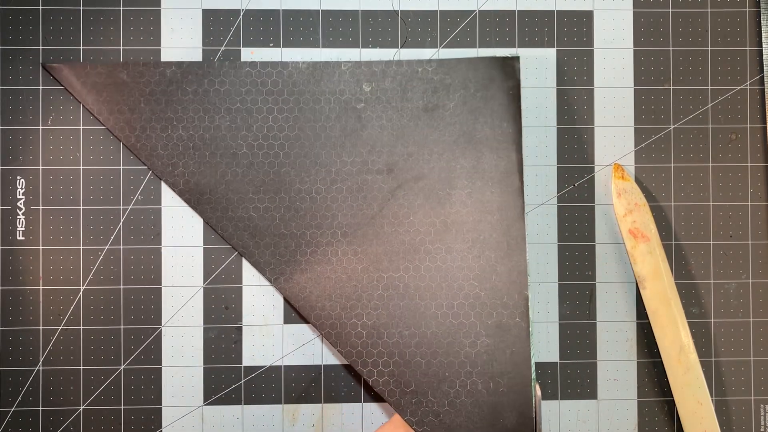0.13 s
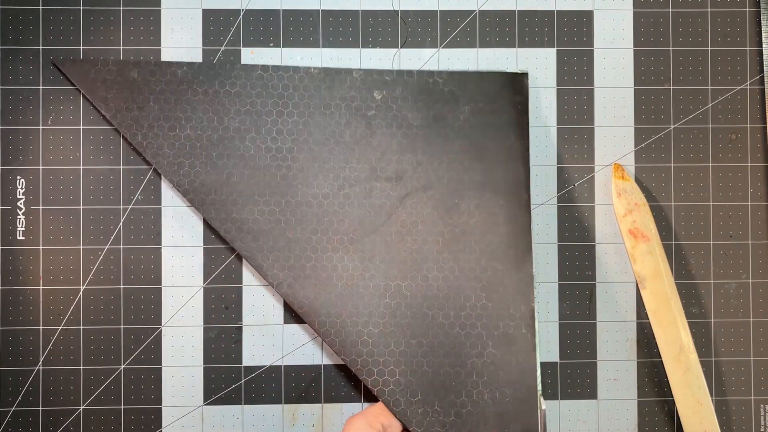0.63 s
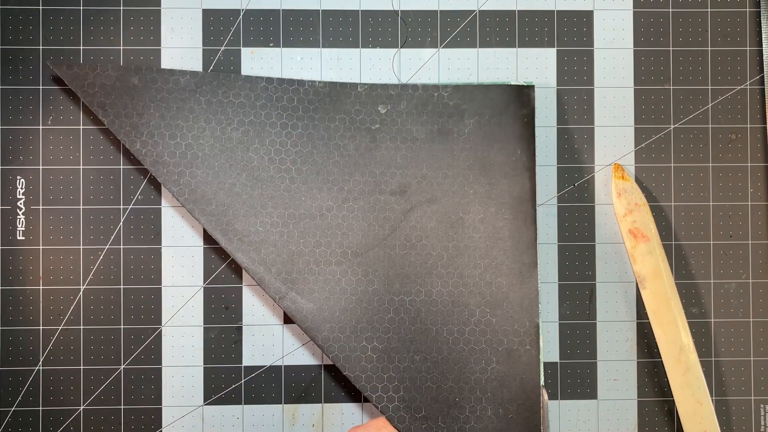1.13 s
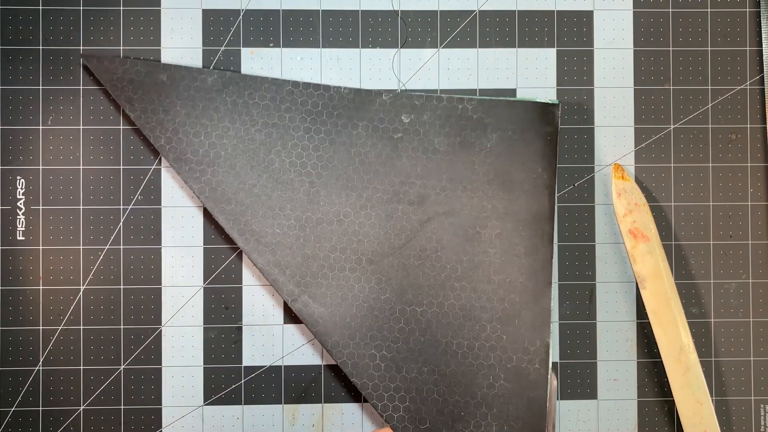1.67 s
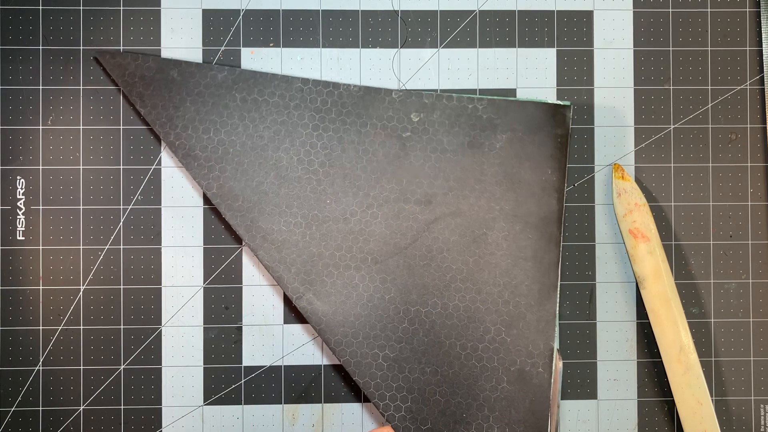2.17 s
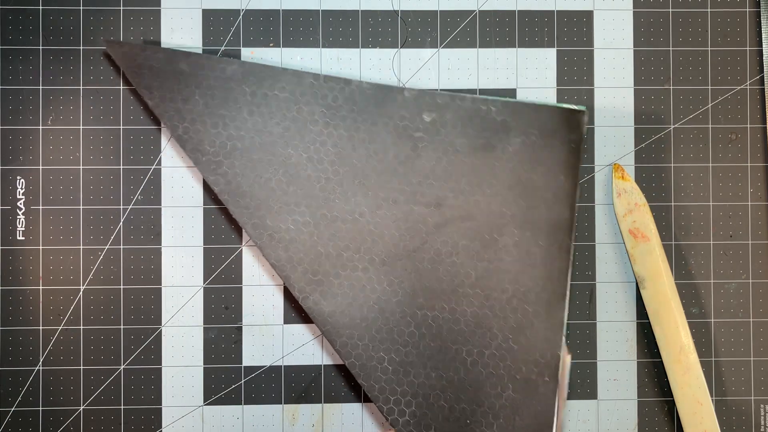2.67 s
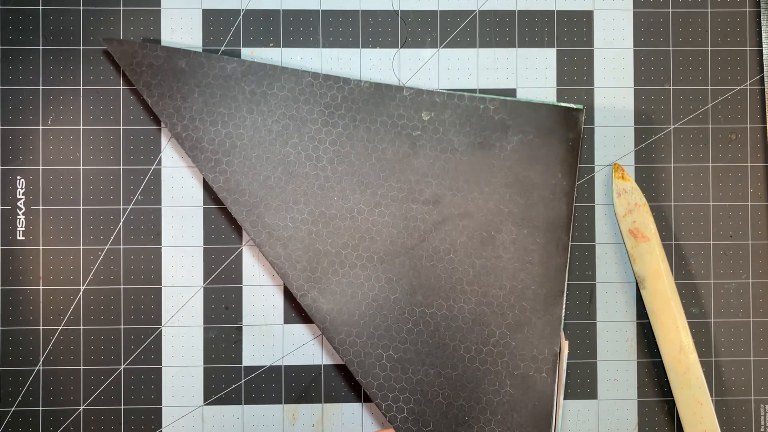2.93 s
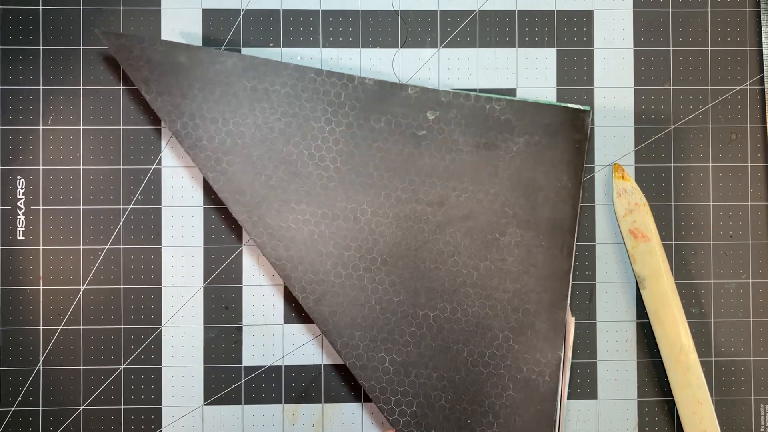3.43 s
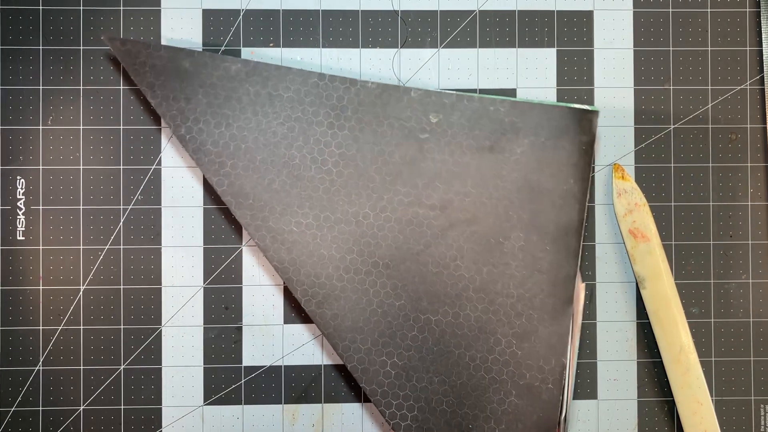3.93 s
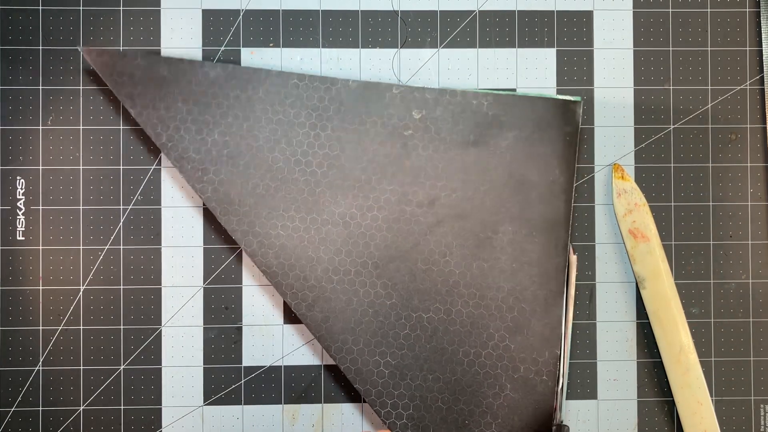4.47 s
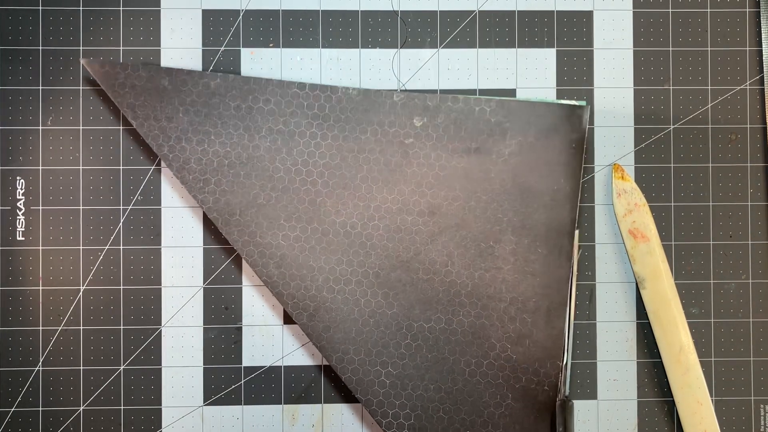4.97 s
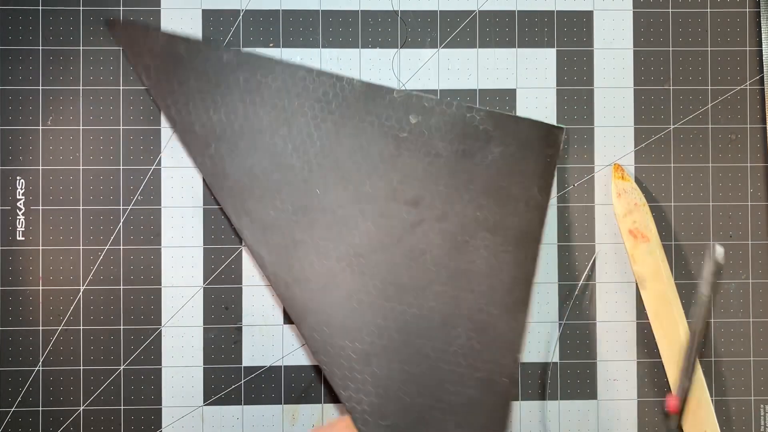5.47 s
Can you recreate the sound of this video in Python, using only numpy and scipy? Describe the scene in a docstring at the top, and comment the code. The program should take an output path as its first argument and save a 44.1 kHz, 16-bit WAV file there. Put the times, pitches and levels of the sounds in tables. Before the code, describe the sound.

A thick sheet is handled with light snaps and dull taps for about a second, then cut by scissors: each bite a short run of hollow, papery crunches with fine hiss, followed by a softer reopening slide. One hard crack stands out. Cutting stops, the sheet is drawn away and scrapes loudly. Near, dry sound, short room tail, faint low rumble.

```python
"""Scissors cutting a stiff sheet

Scissors work along the edge of a stiff sheet held over a craft table, near a two-port microphone.
The sheet snaps lightly while handled, then gives way in jerks to the closing blades; opening blades slide
along the cut. Shaped noise drives the sheet's damped modes and breaks its fibres. Hands rub and rustle it,
small ticks and one loud snap are bursts of noise, and at the end it is drawn off and scrapes past an edge.
A small room answers with diffuse noise tails, over dull thuds, a low rumble and a faint hush."""
import sys
import numpy as np
from scipy import signal
from scipy.fft import rfft, irfft, next_fast_len
from scipy.io import wavfile
from scipy.ndimage import uniform_filter1d, map_coordinates

SR = 44100
rng = np.random.default_rng(int(sys.argv[2]) if len(sys.argv) > 2 else 0)


def ratio_of_db(decibels):
    """Turn decibels (scalar or array-like) into linear amplitude factors; 0 dB maps to 1."""
    return 10 ** (np.asarray(decibels, float) / 20)


def dump(signal):
    """Clip the signal to [-1, 1] and save it as 16-bit WAV at the path in sys.argv[1]."""
    limited = np.clip(np.atleast_2d(signal).T, -1, 1)
    pcm = np.round(limited * 32767).astype(np.int16)
    wavfile.write(sys.argv[1], SR, pcm)


N = 246959  # samples


def unit(x):
    """Normalisation: scale to rms 1."""
    return x / np.sqrt(np.mean(x ** 2) + 1e-20)


def along(points, hz):
    """Logarithmic frequency scale: interpolate (Hz, value) points on it."""
    f, v = np.transpose(points)
    return np.interp(np.log(hz + 1), np.log(f + 1), v)


def gains(rows):
    """Level law: a gain per sample for each dB column, silent outside the table."""
    s, *cols = np.transpose(rows)
    t = np.arange(N) / SR
    return ratio_of_db([np.interp(t, s, c, -150, -150) for c in cols])


def wobble(rate):
    """Slow random fluctuation: a smooth curve through rate random knots a second."""
    knots = rng.standard_normal(int(N * rate / SR) + 4)
    return map_coordinates(knots, [np.arange(N) * rate / SR])


def filtered(x, response):
    """Linear filtering by a complex response of frequency; white noise keeps its power."""
    m = next_fast_len(N + SR // 2)
    h = response(np.fft.rfftfreq(m, 1 / SR))
    h = h / np.sqrt(np.mean(abs(h) ** 2))
    return irfft(rfft(x, m) * h, m)[..., :N]


def causal(spectrum):
    """Causality: the minimum-phase response with the given dB points, by folding the cepstrum."""
    def response(hz):
        cep = irfft(np.log(ratio_of_db(along(spectrum, hz))))
        cep[1:len(hz) - 1] *= 2
        cep[len(hz):] = 0
        return np.exp(rfft(cep))
    return response


def grit(rough_db, rate, patchy_db=4.0):
    """Stick-slip friction: uneven noise of rms 1, coloured by narrow brief resonances of the bent sheet."""
    z = signal.stft(rng.standard_normal(N), nperseg=512)[2]
    field = uniform_filter1d(rng.standard_normal(z.shape), size=2, axis=0)
    field = uniform_filter1d(field, size=5, axis=1)
    noise = signal.istft(z * ratio_of_db(patchy_db * unit(field)), nperseg=512)[1][:N]
    noise = noise * ratio_of_db(rough_db * wobble(rate))
    # running power over about 10 ms, divided out to keep the level steady
    power = abs(uniform_filter1d(noise ** 2, size=500))
    return noise / np.sqrt(power + 1e-12)


def crackle(size_db):
    """Random impulses (Poisson process): single fibres snap and the gain jumps briefly."""
    snaps_per_s, decay_s, most_db = 90, 0.001, 20
    chance, size = rng.random(N), rng.exponential(size=N)
    snaps = (chance < snaps_per_s / SR) * size
    jumps = signal.lfilter([1], [1, -np.exp(-1 / (decay_s * SR))], snaps)
    return ratio_of_db(np.minimum(size_db * jumps, most_db))


def touch(t, rise_s):
    """Smooth onset around t = 0: a faint exponential lead-in, then a quick rise."""
    lead_in, lead_in_s = ratio_of_db(-22), 0.0051
    before = lead_in * np.exp(np.minimum(t, 0) / lead_in_s)
    rise = 1 - (1 - lead_in) * np.exp(-abs(t) / rise_s)
    return np.where(t < 0, before, rise)


def strokes(rows, rise_s, arch_db, t60_s):
    """Amplitude envelopes of sliding contact, three layers: onset, swell, sag and exponential decay."""
    lead = SR // 10
    env, t = np.zeros((3, N + SR)), np.arange(-lead, SR // 2) / SR
    for s, length, *dbs, sag_db in rows:
        u = 2 * np.clip(t / length, 0, 1) - 1  # -1 at the start of the stroke, 1 at its end
        after = np.maximum(t - length, 0)
        shape = touch(t, rise_s) * ratio_of_db(-arch_db * u ** 2 - sag_db * u / 2 - 60 * after / t60_s)
        env[:, round(s * SR):][:, :len(t)] += ratio_of_db(dbs)[:, None] * shape
    return env[:, lead:lead + N]


# Hand and handles bump table and sheet: start_s, level_db (before envelope and wobble),
# pitch_hz (once settled), t60_s
THUDS = [(0.417, -55.5, 538, 0.13), (.445, -67.5, 342, 0.11), (.46, -59, 65.4, 0.18),
         (.55, -54.5, 420, 0.076), (.63, -52.5, 594, 0.08), (0.946, -49.5, 492, 0.048),
         (3.563, -54, 260, 0.029), (3.578, -56, 76, 0.16), (4.748, -48, 130, 0.071), (4.754, -47, 80, 0.2)]


def bumps():
    """Damped oscillation: dull sinking rings whose phase wanders, the more so the higher they sound."""
    drop, drop_s = 0.4, 0.015  # a thud starts higher by this share and settles
    out, t = np.zeros(N + SR), np.arange(SR // 2) / SR
    for s, db, hz, t60 in THUDS:
        wander = hz / 5000 * np.cumsum(rng.standard_normal(len(t)))  # radians
        settling = t - drop * drop_s * np.exp(-t / drop_s)
        envelope = ratio_of_db(db - 60 * t / t60) * (1 - np.exp(-t / 0.004))
        out[round(s * SR):][:len(t)] += envelope * np.sin(2 * np.pi * hz * settling + wander)
    return out[:N] * ratio_of_db(3.1 * wobble(79))


# Spectrum of the building rumble: frequency_hz, density_db
RUMBLE_SPECTRUM = [(20, -23.5), (40, -7.5), (60, 6.5), (85, 7), (110, 2), (200, -8.5), (310, -10.5),
                   (500, -28.5), (900, -120)]
# Course of the rumble: time_s, level_db
RUMBLE_COURSE = [(0.0, -75.5), (0.7, -76.5), (1.3, -76.5), (2.0, -79.5), (2.8, -82.5), (3.4, -80.5),
                 (4.2, -83), (4.9, -84), (5.6, -85.5)]
# Spectrum of the hush: frequency_hz, density_db
HUSH_SPECTRUM = [(200, -11.5), (600, -14.5), (1200, 8.5), (2500, -1), (6000, -10.5), (12000, -20),
                 (16000, -34.5)]


def air():
    """Partial coherence: a rumble and a faint hush, each mostly common to both ports, and the thuds."""
    common, opposed, hush_common = rng.standard_normal((3, N))
    rumble = filtered(common + 0.51 * np.array([opposed, -opposed]),
                      lambda hz: ratio_of_db(along(RUMBLE_SPECTRUM, hz)))
    hush = filtered(hush_common + 0.27 * rng.standard_normal((2, N)),
                    lambda hz: ratio_of_db(along(HUSH_SPECTRUM, hz)))
    return gains(RUMBLE_COURSE) * ratio_of_db(2.0 * wobble(2.2)) * rumble + ratio_of_db(-80.5) * hush + bumps()


# Decay of the room: frequency_hz, t60_s
ROOM_DECAY = [(300, 0.2), (1200, 0.17), (5000, 0.28), (12000, 0.11)]
# Share of the tail's power common to both ports: frequency_hz, share
TAIL_COHERENCE = [(250, 0.15), (1000, 0.17), (2500, 0.24), (5500, 0.59), (12000, 1)]


def room(x):
    """Diffuse reverberation: a fresh decaying noise tail for each quarter second, partly shared by the ports."""
    delay = 120  # samples before the tail
    out, step = np.zeros((2, N + SR)), SR // 4
    for i in range(0, N, step):
        hz, t, z = signal.stft(rng.standard_normal((3, SR // 2)), SR, nperseg=256)
        share = np.clip(along(TAIL_COHERENCE, hz), 0, 1)[:, None]
        z = np.sqrt(share) * z[0] + np.sqrt(1 - share) * z[1:]
        z = z * ratio_of_db(-60 * t / along(ROOM_DECAY, hz)[:, None])
        tails = signal.istft(z, SR, nperseg=256)[1]
        tails = tails / np.linalg.norm(tails[0])
        wet = signal.fftconvolve(x[None, i:i + step], tails, axes=1)
        out[:, i + delay:][:, :wet.shape[1]] += wet
    return out[:, :N]


# Phase between the ports: frequency_hz, left_lead_rad
PORT_LEAD = [(0, -.4), (300, -1), (700, -.8), (1200, -.3), (1980, .5), (3700, 1.4), (5500, 3.14),
             (7000, 4.9), (8500, 6.28), (10100, 7.8), (11700, 9.42), (14000, 12), (16300, 14)]
# Level between the ports: frequency_hz, left_minus_right_db
PORT_BALANCE = [(200, -1.5), (400, 4.5), (700, -1), (1300, -1.5), (4000, 0), (12000, 0)]


def ports(x):
    """Phase and level differences between two receivers; they drift as hands and sheet move."""
    f, lead = np.transpose(PORT_LEAD)

    def half(hz):
        return ratio_of_db(along(PORT_BALANCE, hz) / 2) * np.exp(.5j * np.interp(hz, f, lead))

    left, right = filtered(x, lambda hz: np.array([half(hz), 1 / half(hz)]))
    drift = 0.078 * wobble(3.256)  # samples, opposite in the two ports
    return np.array([map_coordinates(left, [np.arange(N) + drift], order=5),
                     map_coordinates(right, [np.arange(N) - drift], order=5)])


# Modes of the held sheet: pitch_hz, width_hz (of the simple resonance), density_db
SHEET_MODES = [(420, 54, -31.5), (704, 310, -23), (919, 88, -4), (1147, 423, 3.5), (1421, 390, -10.5),
               (1734, 245, -7.5)]
# The two lowest modes depend on how the sheet is gripped: time_s, strength_db
LOW_MODE_COURSE = [(0.0, 0), (1.0, 8), (1.9, 6.5), (2.3, -3), (3.0, -2), (3.6, -1.5), (4.2, -3), (5.6, -4)]


def sheet(force):
    """Modal resonance: one train of slips drives all modes, whose strengths drift with grip and cut."""
    low_hz = 780  # modes below this follow the grip
    pitches, widths, dbs = np.transpose(SHEET_MODES)
    weight = ratio_of_db(dbs) * np.sqrt(widths)
    shares = unit(weight) / np.sqrt(len(SHEET_MODES))
    slips = grit(1.94, 700, patchy_db=0.8)
    out = np.zeros(N)
    for hz, width, share in zip(pitches, widths, shares):
        def mode(f):
            return (1j * f * width / (hz * hz - f * f + 1j * f * width)) ** 1.772

        grip = gains(LOW_MODE_COURSE)[0] if hz < low_hz else 1
        out += share * filtered(force * grip * ratio_of_db(2.78 * wobble(16)) * slips, mode)
    return out


# Spectrum of the coarse crunch: frequency_hz, density_db
CRUNCH_SPECTRUM = [(1500, -22.5), (2200, -0.5), (2900, 1), (3700, 1), (4600, 1), (5500, -19.5)]
# Spectrum of the fine fibre hiss: frequency_hz, density_db
HISS_SPECTRUM = [(3500, -29.5), (4800, -5), (5800, -5), (7000, -4), (8200, -1), (9300, -3), (10500, -5),
                 (12000, -14), (14000, -10), (16000, -23), (17000, -39)]


def fibres(crunch, hiss):
    """Fracture noise: breaking paper fibres give a coarse crunch and a fine hiss."""
    coarse = filtered(crunch * grit(1.1, 500), causal(CRUNCH_SPECTRUM))
    fine = filtered(hiss * grit(2.1, 900), causal(HISS_SPECTRUM))
    return coarse + fine


# The sheet scraping past an edge: time_s, level_db
SCRAPE_COURSE = [(5.5345, -55), (5.536, -32), (5.541, -39.5), (5.555, -33.5), (5.566, -31), (5.6, -32)]
# Spectrum of that scrape: frequency_hz, density_db
SCRAPE_SPECTRUM = [(250, -30), (450, -22.5), (620, -10), (900, -30.5), (1250, -15.5), (1600, 4), (1800, -3),
                   (2050, 5), (2500, -7.5), (3000, -2), (3600, -15), (5000, -27), (8500, -60), (15500, -51)]


def sweep():
    """Friction noise: the last scrape, crackling grit through a minimum-phase colour."""
    scrape = gains(SCRAPE_COURSE)[0] * crackle(4) * grit(1.46, 350, patchy_db=2.5)
    return filtered(scrape, causal(SCRAPE_SPECTRUM))


# Small ticks and one loud snap of the sheet: start_s, peak_db (nominal), knock_db (relative), length_ms
TICK_EVENTS = [(0.1133, -41, 1, 1.8), (0.127, -51.5, 17.5, 1.8), (0.2534, -31.5, -11, 2.5),
               (0.488, -46.5, -30, 1.8), (0.5133, -42, -29, 2), (0.8544, -35.5, 2.5, 0.73),
               (0.9626, -47, -12, 1.2), (2.0211, -7, -13.5, 1.8), (2.6319, -38.5, -4, 2),
               (2.8844, -33, -0.5, 3.1), (3.04, -36.5, -15, 2.9), (3.123, -59.5, -10, 2.2),
               (3.1336, -48.5, 14.5, 2.5), (3.3923, -43, -13.5, 2), (3.5616, -53.5, 8, 1.5),
               (4.409, -53, -8, 1.4), (4.4285, -54, 5.5, 2.8), (4.6949, -69.5, 21, 1.44),
               (4.743, -25, -18.5, 1), (4.9569, -27, -15, 0.65), (5.227, -73.5, -12, 2.2),
               (5.5366, -45, -6.5, 1.5)]
# Spectrum of the crack: frequency_hz, density_db
CRACK_SPECTRUM = [(1500, -25), (3000, -15), (5000, 5), (7000, -1.5), (10500, -6.5), (12500, -12),
                  (16000, -33)]


def ticks():
    """Impulsive excitation: a brief crack also knocks the sheet; the walls get one even impulse."""
    crest_db, t60_s = 8.5, 0.0034  # peak over rms, dying out
    crack, knock, far = np.zeros((3, N + SR))
    t = np.arange(SR // 20) / SR
    for s, db, knock_db, ms in TICK_EVENTS:
        after = np.maximum(t - ms / 1000, 0)
        burst = ratio_of_db(db - crest_db - 60 * after / t60_s)
        start = round(s * SR)
        crack[start:][:len(t)] += burst
        knock[start:][:len(t)] += burst * ratio_of_db(knock_db)
        far[start] = np.linalg.norm(burst)
    colour = causal(CRACK_SPECTRUM)
    cracks = filtered(crack[:N] * rng.standard_normal(N), colour)
    return cracks, sheet(knock[:N]), filtered(far[:N], colour)


# Fingers shifting the sheet: start_s, length_s, rub_db, crunch_db, hiss_db, sag_db (fall over the move)
FINGER_MOVES = [(0.0, 0.024, -52.5, -53.5, -60, 10), (.029, .012, -52, -54, -62.5, 2),
                (.046, 0.021, -46.5, -46.5, -58.5, 6.5), (.072, 0.062, -50.5, -53.5, -62, -4.5),
                (.176, 0.038, -57, -64.5, -67, -5), (.29, 0.092, -68, -66.5, -69.5, -3),
                (.37, 0.029, -58.5, -50.5, -56, 14.5), (.425, 0.17, -76.5, -74.5, -77.5, 26),
                (.535, 0.051, -55.5, -53, -54.5, -12), (.6, 0.078, -62.5, -63, -65.5, 6.5),
                (.68, 0.16, -59, -63.5, -65, 6.5), (.832, 0.031, -55.5, -58, -65, 1),
                (.878, 0.08, -59, -71, -69.5, 1.5)]
# Spectrum of the rubbing: frequency_hz, density_db
RUB_SPECTRUM = [(250, -33.5), (450, -27), (700, -14), (1200, 3.5), (1800, -2.5), (2400, -7), (3500, -39)]
# The sheet drawn off the blades: time_s, level_db
DRAW_COURSE = [(5.28, -100.5), (5.314, -65.5), (5.36, -59), (5.434, -49.5), (5.496, -45), (5.562, -51),
               (5.6, -51)]
# Spectrum of the drawing off: frequency_hz, density_db
DRAW_SPECTRUM = [(250, -18.5), (500, -20.5), (800, -24), (1150, -1), (1500, -5.5), (1900, 2.5), (2600, 2),
                 (3600, 5.5), (5000, -0.5), (6500, 6), (8500, 3), (10500, -2), (12500, -8.5), (15500, -14)]


def handling():
    """Sliding friction: hands rub and rustle the sheet, then draw it off the blades."""
    moves = strokes(FINGER_MOVES, rise_s=0.0023, arch_db=4, t60_s=0.043)
    rub, crunch, hiss = moves * crackle(5) * ratio_of_db(1.7 * wobble(88.33))
    rustle = filtered(rub * grit(1.43, 400), causal(RUB_SPECTRUM)) + fibres(crunch, hiss)
    drawn = gains(DRAW_COURSE)[0] * crackle(3) * grit(1.0, 370)
    return rustle + filtered(drawn, causal(DRAW_SPECTRUM))


# The sheet snaps while handled, then gives way in jerks to the blades:
# start_s, length_ms, ring_db, crunch_db, hiss_db
SHEET_JERKS = [(0.008, 1.5, -52, -48, -62), (0.0465, 1.2, -44, -42, -60), (0.1005, 1.5, -50, -48, -62),
               (0.161, 10.1, -35, -46.5, -55.5), (0.2132, 5.6, -39, -50, -55),
               (0.2314, 15, -45.5, -53.5, -61), (0.2552, 1.8, -57, -39, -51),
               (0.2779, 5, -40.5, -45.5, -51), (0.3695, 1.2, -46, -42, -55), (0.4205, 1.3, -42, -43, -54),
               (0.607, 6.9, -48.5, -60, -71), (0.622, 7.9, -44.5, -53, -59), (0.6347, 5, -49, -56, -55.5),
               (1.0648, 5, -45.5, -61, -60.5), (1.0956, 26.6, -44.5, -67, -58.5),
               (1.129, 10.6, -37, -51.5, -52), (1.155, 8.4, -39.5, -54.5, -48.5),
               (1.1772, 2.5, -28.5, -50.5, -45), (1.2021, 3.8, -31, -53.5, -43.5),
               (1.65, 10.3, -39.5, -78, -54), (1.6688, 8.9, -41.5, -59.5, -55.5),
               (1.6811, 4, -37, -57, -51), (1.7236, 3.1, -28, -69.5, -39), (1.7792, 2.2, -33, -69.5, -52),
               (1.8065, 10.9, -33, -89.5, -51.5), (1.8711, 7.2, -38, -52.5, -52.5),
               (2.331, 6.9, -42, -55.5, -46.5), (2.3503, 4.2, -43, -52, -54),
               (2.3616, 22.3, -45.5, -61, -56.5), (2.4241, 10.4, -37.5, -46.5, -46.5),
               (2.4656, 7.1, -38.5, -51.5, -49.5), (2.4999, 7.4, -29.5, -45.5, -43),
               (2.521, 5.1, -36, -54.5, -46), (2.5511, 2.9, -52, -57, -48), (2.858, 10.8, -38, -48.5, -44),
               (2.8825, 7.3, -31.5, -52, -44), (2.93, 8, -41, -64, -55), (3.2987, 19.6, -39.5, -55.5, -51),
               (3.3281, 9.9, -36.5, -52.5, -48.5), (3.3424, 8.2, -41.5, -52.5, -58),
               (3.563, 8, -48, -58, -58), (3.6967, 11, -39.5, -51, -47), (3.718, 18.4, -36, -56, -47),
               (3.75, 7, -35, -51.5, -46), (3.7711, 2.6, -39.5, -64, -49.5),
               (4.0831, 12.8, -38.5, -52, -46), (4.0998, 1.9, -43, -55.5, -76),
               (4.116, 10.2, -31, -44, -37), (4.1576, 6.6, -39, -56, -47), (4.564, 9.5, -37, -51, -46.5),
               (4.594, 8.6, -40.5, -52, -45), (4.9152, 14.3, -50.5, -69, -61.5),
               (4.9372, 6.5, -50, -56.5, -63), (4.9571, 2.96, -39, -37.5, -37.5),
               (5.1396, 8.2, -60, -57.5, -59)]


def jerks():
    """Sudden release, as ring, crunch and hiss envelopes: a sharp start, a held level, a weak slow tail."""
    accent, accent_s, rise_s = 0.17, 0.00052, 0.0018  # extra share, its decay, rise of the onset
    t60_s, tail_db, tail_t60_s = 0.014, -28, 0.04
    lead = SR // 10
    env, t = np.zeros((3, N + SR)), np.arange(-lead, SR // 4) / SR
    for s, ms, *dbs in SHEET_JERKS:
        after = np.maximum(t - ms / 1000, 0)
        release = (1 + accent * np.exp(-abs(t) / accent_s)) * ratio_of_db(-60 * after / t60_s)
        tail = ratio_of_db(tail_db - 60 * after / tail_t60_s)
        shape = touch(t, rise_s) * (release + tail)
        start = round((s - rise_s) * SR)  # the rise begins just ahead of the listed time
        env[:, start:][:, :len(t)] += ratio_of_db(dbs)[:, None] * shape
    return env[:, lead:lead + N]


# Blades sliding along the cut, small rustles, and the sheet ringing around the snap:
# start_s, length_s, ring_db, crunch_db, hiss_db, sag_db (fall over the stroke)
SLIDES_AND_RUSTLES = [(1.3, 0.054, -70.5, -67.5, -68, -6), (1.41, 0.019, -64, -50.5, -58.5, -1.5),
                      (1.348, .14, -50.5, -57, -56, -5.5), (1.495, 0.061, -63, -63, -63.5, 3),
                      (1.978, 0.021, -59.5, -60.5, -64, 4), (2.004, 0.016, -57.5, -56, -52, -20),
                      (2.026, 0.19, -57, -61, -62.5, 32.5), (2.205, 0.048, -76, -72, -82, -1),
                      (2.302, 0.018, -62.5, -71, -71.5, 8), (2.63, 0.097, -44, -53, -49, -4.5),
                      (2.892, 0.037, -37.5, -49.5, -50.5, 8), (3.066, 0.14, -48.5, -57.5, -54, 12.5),
                      (3.2, 0.037, -57, -73, -72, 6), (3.392, 0.021, -54.5, -68, -66, 21),
                      (3.49, 0.11, -47, -56.5, -50.5, 4), (3.875, 0.12, -47, -54.5, -52.5, 0),
                      (4.276, 0.088, -53.5, -60.5, -58.5, 13.5), (4.432, .055, -76, -77.5, -75, 9),
                      (4.51, 0.038, -75.5, -90, -76, -8), (4.602, 0.051, -58.5, -69, -78.5, 27),
                      (4.722, 0.094, -49.5, -50.5, -54.5, 17), (4.855, 0.028, -65.5, -65, -75, 6),
                      (4.965, 0.04, -63, -70, -79.5, 20), (5.075, 0.097, -63.5, -65.5, -70.5, 0),
                      (5.212, 0.013, -71.5, -62, -64.5, -8)]


def blades():
    """Forced vibration: jerks and slides, unevenly caught on the grain, drive modes and break fibres."""
    catch = wobble(300)
    jerked = ratio_of_db(0.62 * catch) * jerks()
    slide = strokes(SLIDES_AND_RUSTLES, rise_s=0.0038, arch_db=8.5, t60_s=0.052) * crackle(4.5)
    slide = slide * ratio_of_db(np.array([[1.5], [1.2], [0.6]]) * catch)  # ring, crunch, hiss
    ring, crunch, hiss = jerked + slide
    return sheet(ring) + fibres(crunch, hiss)


def scene():
    """Superposition: near sounds and all reverberation through the ports, the scrape, the background."""
    crack, knock, far = ticks()
    near, scrape = blades() + handling() + knock, sweep()
    heard = ports(near + crack + ratio_of_db(-10.0) * room(near + far + scrape))
    scrape_ahead = scrape * ratio_of_db([[0.3], [-0.3]])  # from straight ahead: both ports together, left, right dB
    return heard + scrape_ahead + air()


def roll_off(x):
    """The treble ends steeply here."""
    return signal.sosfilt(signal.butter(12, 16670, fs=SR, output="sos"), x)


def record(dry):
    """Signal chain: the finished mix goes to its last stage."""
    return roll_off(dry)


dry = scene()
out = record(dry)
dump(out)
```